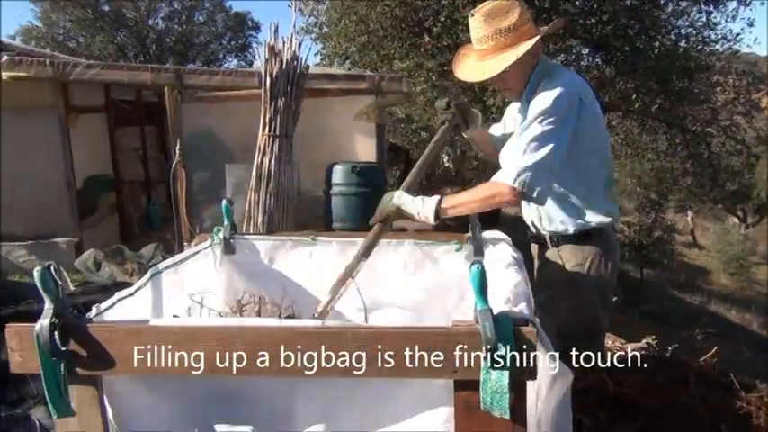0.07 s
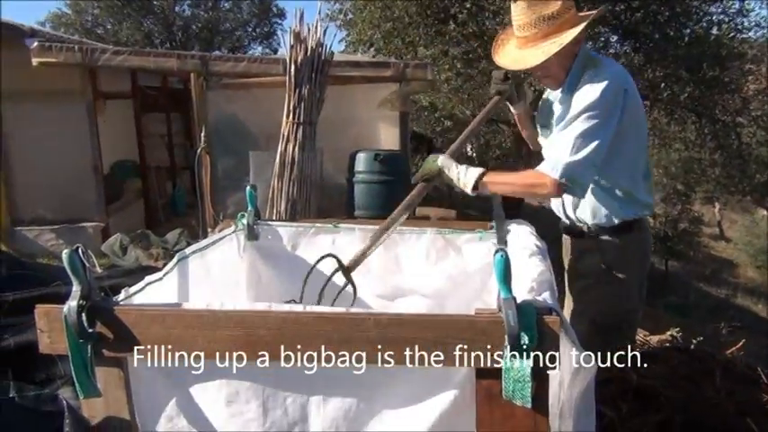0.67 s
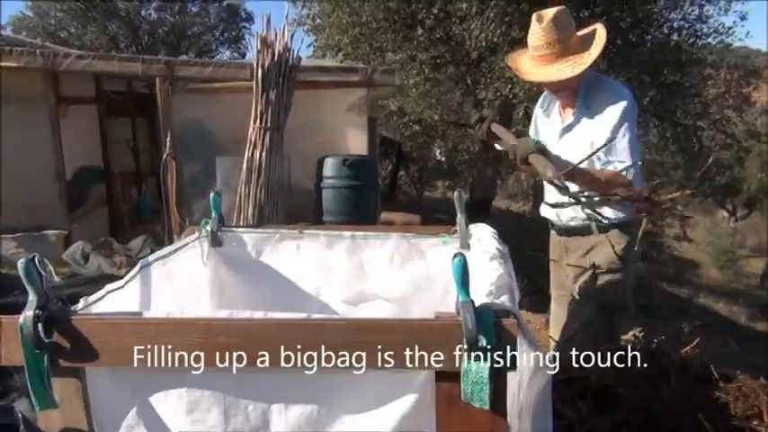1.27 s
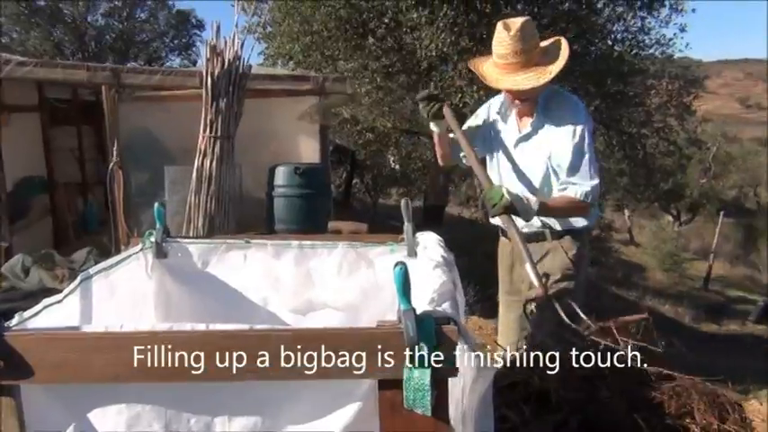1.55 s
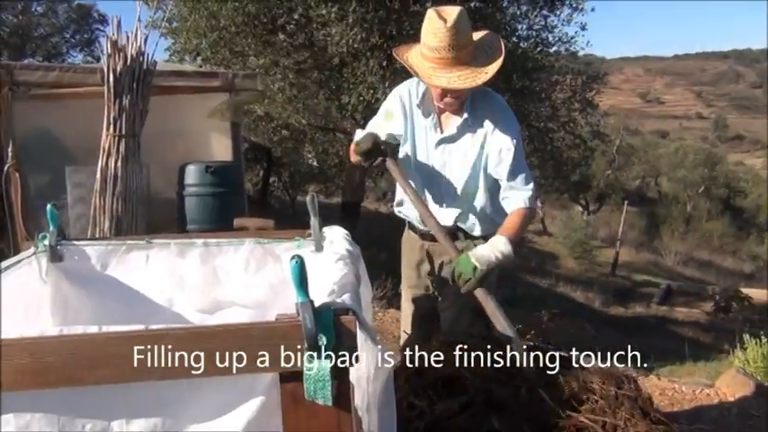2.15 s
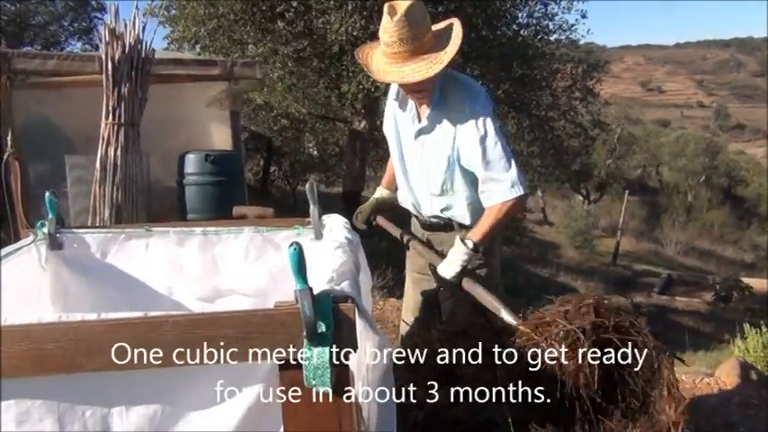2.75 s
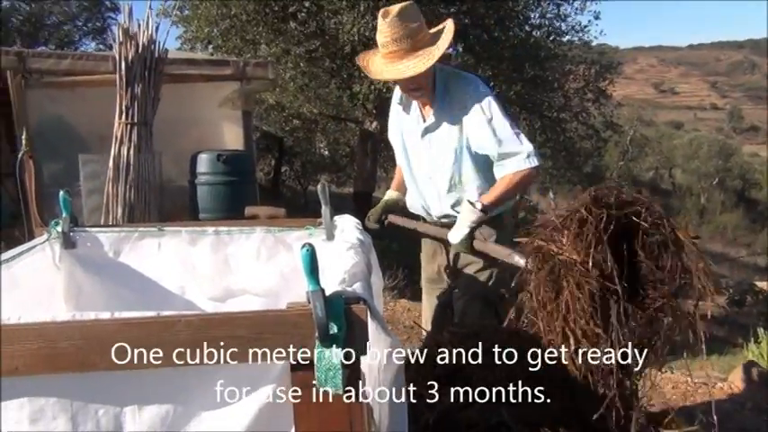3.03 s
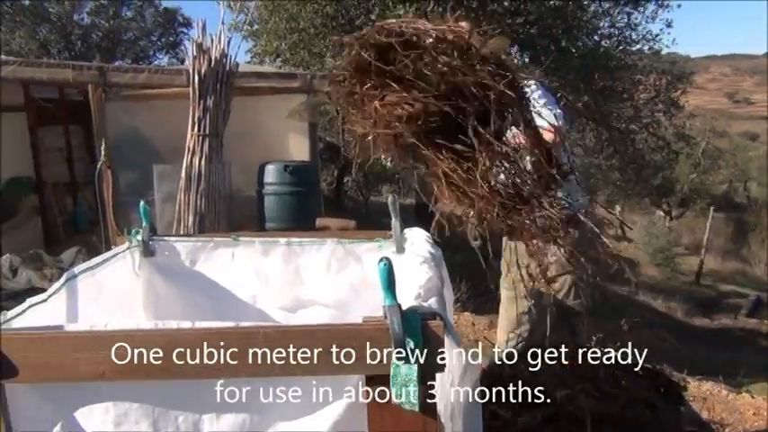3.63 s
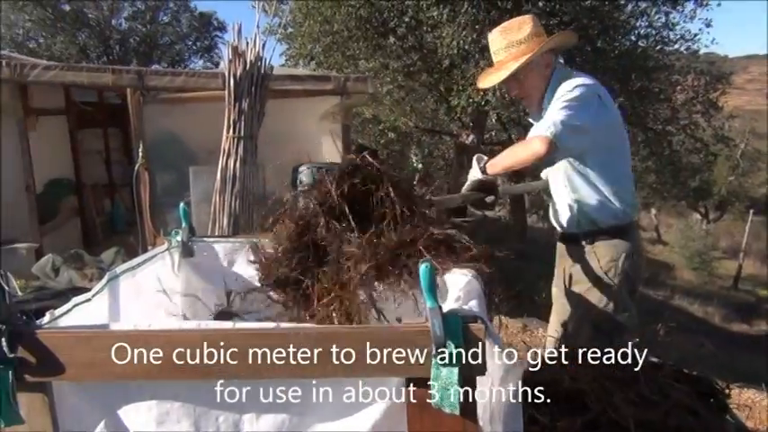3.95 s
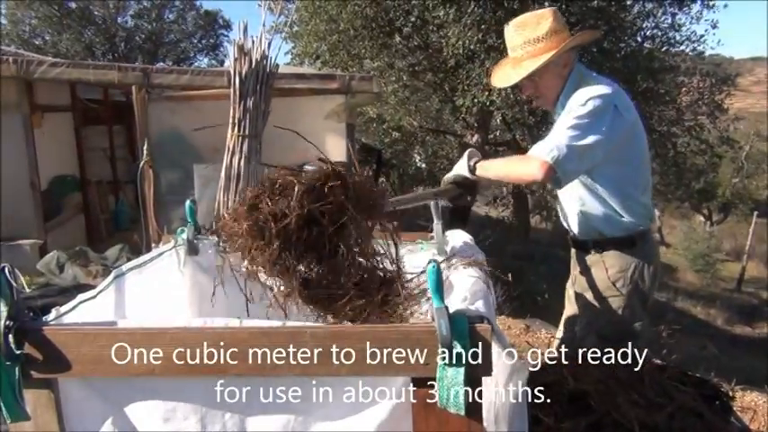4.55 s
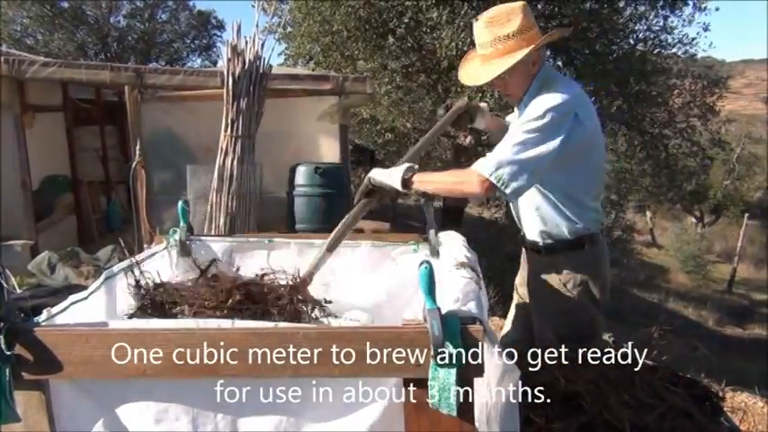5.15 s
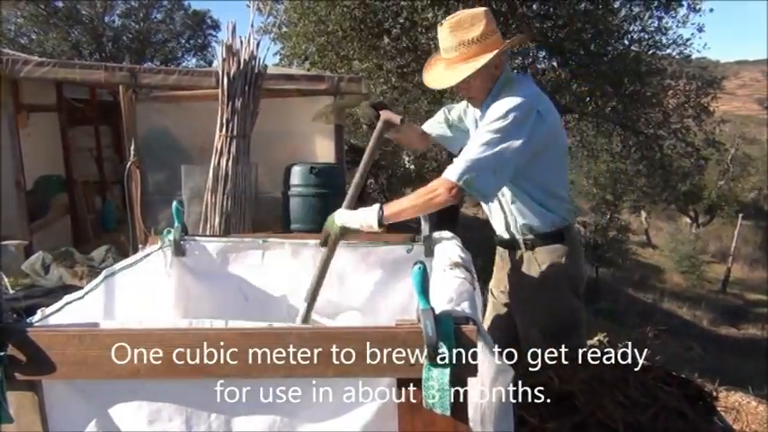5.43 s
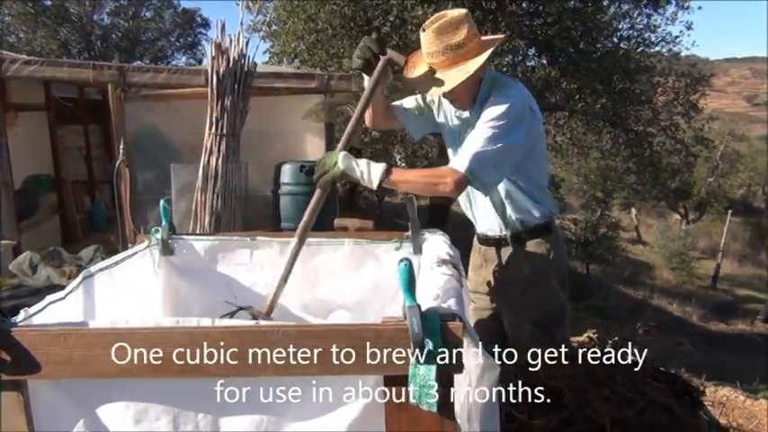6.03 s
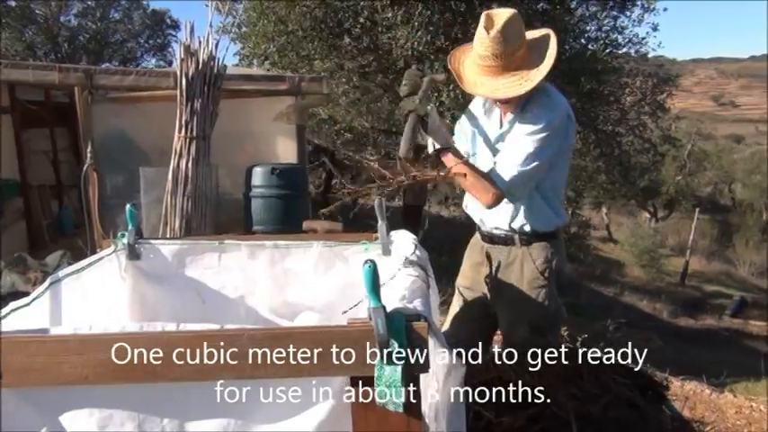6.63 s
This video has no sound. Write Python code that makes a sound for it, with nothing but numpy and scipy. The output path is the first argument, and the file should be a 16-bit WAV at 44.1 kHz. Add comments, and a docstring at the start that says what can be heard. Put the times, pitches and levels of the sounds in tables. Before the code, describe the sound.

Outdoors, a forkful of dry, half-composted grass knocks onto a big woven bag and slides down it in a crackling rush. More quietly, the steel pitchfork scrapes the ground with a brief ring and rakes the heap, snapping stalks. Two more rushes follow, with clods drumming on the taut fabric slightly to the left. Behind it are a faint open-air hiss, one thin bird call and light wind on the microphone.

```python
"""Knocks and dense crackling rushes: a pitchfork shakes dry, half-composted grass into a big woven bag.
Clods drum on the taut fabric, then each forkful slides down it, rubbing and breaking in tiny fractures.
Between loads the steel tines ring on the ground and rake the heap; single stalks snap.
Behind it: one thin bird call, light wind on the microphone, a hiss of open air and a faint hollow hum."""
import sys
import numpy as np
from scipy import signal
from scipy.fft import rfft, irfft, next_fast_len
from scipy.io import wavfile
from scipy.ndimage import map_coordinates

SR = 44100
rng = np.random.default_rng(int(sys.argv[2]) if len(sys.argv) > 2 else 0)


def to_wav(s):
    """Save 16-bit WAV."""
    ch = np.atleast_2d(s).T  # columns
    pcm = np.round(np.clip(ch, -1, 1) * 32767)  # PCM
    wavfile.write(sys.argv[1], SR, pcm.astype(np.int16))


N = 299439

# spectra of dry stalks, crunching heap, buffeting air: (frequency [Hz], density [dB])
STALK_SPECTRUM = [(200, -63.5), (1200, -10.5), (3000, 0), (4500, -2), (6000, -3.5), (7600, 1), (9500, 0.5),
                  (11500, -4), (13500, -9), (16000, -22)]
CRUNCH_SPECTRUM = [(60, -13), (200, 1), (500, 4), (900, -2), (1500, 3), (2600, -3.5), (4000, -6.5),
                   (8000, -14)]
GUST_SPECTRUM = [(20, -10), (45, 2.5), (85, 2.5), (130, -3.5), (220, -25.5), (500, -51.5)]
# wind on the microphone: (time [s], level [dB], frequency [Hz])
WIND_PUFFS = [(1.283, -42, 65.5), (1.77, -43.5, 80), (1.921, -40.5, 50), (2.895, -41.5, 54.7),
              (3.246, -47.5, 60), (5.66, -31.5, 50), (5.84, -38.5, 65), (6.538, -29, 90), (6.659, -38, 65)]
# background gain: (time [s], level [dB])
BACKGROUND_GAIN = [(0, -2.5), (2.9, 0), (3.15, -5), (3.7, -9.5), (3.95, -16), (4.9, -7.5), (5.9, 3),
                   (6.79, 3.5)]


def slide(rasp_db=-2, billow_db=-17):
    """The load thumps the bag, scrapes over its weave and crackles within itself."""
    # spectra: (frequency [Hz], density [dB])
    weight_spectrum = [(20, -40), (60, -14), (110, -4), (160, -3), (220, 0), (300, -4), (450, -15),
                       (900, -45)]
    rub_spectrum = [(50, -64.5), (170, -17), (330, -9.5), (520, 0.5), (680, -3), (850, -4.5), (1150, -3),
                    (1700, -6.5), (2700, -11), (3600, -16), (5000, -19.5), (9000, -29)]
    rasp_spectrum = [(100, -69.5), (600, -26.5), (1300, 2), (1750, 2), (2900, -2.5), (3700, -10.5),
                     (6000, -31)]
    fabric_db, stalk_db, weight_db = slide_levels()
    billow = amp(weight_db + billow_db) * unit(stereo(colour(rng.standard_normal((2, N)), GUST_SPECTRUM)))
    thump = crackle(weight_spectrum, rate_hz=300, spread_db=1, rub_db=-8, clump_db=1, clump_hz=40)
    rush = crackle(rub_spectrum, rate_hz=1800, spread_db=2.5, rub_db=-4, clump_db=1.7, clump_hz=80)
    trickle = crackle(rub_spectrum, rate_hz=700, spread_db=1.5, rub_db=-4, clump_db=3, clump_hz=70)
    rasp = crackle(rasp_spectrum, rate_hz=1700, spread_db=3, rub_db=2, clump_db=3, clump_hz=180)
    fizz = crackle(STALK_SPECTRUM, rate_hz=2500, spread_db=3, rub_db=-3, clump_db=1.4, clump_hz=160)
    ticks = crackle(STALK_SPECTRUM, rate_hz=900, spread_db=4.5, rub_db=-5, clump_db=2.8, clump_hz=85)
    flow = np.clip((fabric_db + 41) / 20.5, 0, 1)  # 0: separate grains, 1: dense pour
    speed = np.clip((fabric_db + 22.5) / 8, 0, 1)  # only the fastest sliding rasps
    fabric = amp(fabric_db) * (blend(rush, trickle, flow) + speed * amp(rasp_db) * rasp)
    stalks = amp(stalk_db) * blend(fizz, ticks, flow)
    return billow + amp(weight_db) * thump + fabric + stalks


def slide_levels(dull_db_per_s=9.5, settle_db_per_s=10.5):
    """Fabric, stalk and weight levels [dB]; as a load packs down, stalks fade and weight tells more."""
    # sliding grass: (start [s], attack [s], hold [s], release [s], fabric [dB], stalk [dB], weight [dB])
    slides = [(0, 0.0015, .03, 0.04, -21.5, -29, -29.5), (0.043, 0.036, 0.061, .03, -29.5, -29, -38.5),
              (0.102, 0.031, 0.084, 0.19, -15, -15, -26), (0.419, .006, 0.017, .3, -34.5, -39, -47),
              (0.635, 0.011, 0.0087, 0.043, -35.5, -42, -49), (0.798, .06, 0.16, 0.14, -49.5, -66.5, -60),
              (3.759, 0.013, 0.13, 0.18, -40, -42, -47.5), (3.848, 0.17, .035, .04, -37.5, -31, -42),
              (4.053, .009, 0.023, 0.055, -22.5, -23, -34.5),
              (4.087, 0.038, 0.058, 0.35, -18.5, -23, -32.5), (4.543, 0.036, .05, 0.85, -47.5, -48, -59),
              (5.024, 0.013, .03, .12, -33.5, -37.5, -39.5), (5.134, .12, .04, .06, -29, -37.5, -42),
              (5.264, 0.051, .12, .19, -19, -23, -33.5), (5.526, 0.046, .02, .08, -20.5, -26, -32),
              (5.607, 0.05, .015, 0.088, -20, -22.5, -32), (5.697, 0.036, 0.017, 0.26, -36, -37, -42),
              (5.928, 0.038, .1, 0.7, -50.5, -53.5, -59.5)]
    power = np.full((3, N), 1e-12)
    for start_s, attack_s, hold_s, release_s, fabric_db, stalk_db, weight_db in slides:
        gain = swell(start_s, attack_s, hold_s, release_s)
        on = gain > 1e-4
        age_s = np.flatnonzero(on) / SR - start_s
        power[0, on] += (gain[on] * amp(fabric_db)) ** 2
        power[1, on] += (gain[on] * amp(stalk_db - dull_db_per_s * age_s)) ** 2
        power[2, on] += (gain[on] * amp(weight_db + settle_db_per_s * age_s)) ** 2
    return 10 * np.log10(power)


def clods(crumble_s=0.0056, crumble_db=-22, rattle_db=-14, crackle_t60_s=0.054, contact_hz=2700,
          crease_hz=1617, crease_scatter=0.048, gain_db=-21):
    """Each clod slaps the fabric once and crumbles; hard ones also rattle over its creases."""
    # (time [s], level [dB], hardness [dB], crackle [dB], drum pitch [Hz])
    impacts = [(0.016, 1, -9.5, -14.5, 468), (0.116, -5.5, -3, -10, 659), (0.43, -13.5, -6.5, -23.5, 650),
               (0.538, -19.5, -1.5, -22.5, 436), (0.557, -19, -7.5, -26, 653),
               (0.576, -17.5, -10, -23, 427), (0.605, -24.5, -2, -10, 554),
               (0.641, -19.5, -9.5, -12.5, 590), (0.751, -28.5, -15, -17.5, 524),
               (0.798, -28, -5.5, -4.5, 590), (0.915, -33, -2, -21, 603), (0.944, -10.5, -16, -20.5, 537),
               (3.771, -30, -6, -11.5, 430), (4.003, -9, -25, -13, 600), (4.012, -15, -10, -7, 590),
               (4.055, -15.5, -10, -9.5, 695), (4.1, -5, -8, -20, 540), (4.205, -6, -29, -23.5, 570),
               (4.448, -13.5, -30, -14.5, 547), (4.584, -26.5, -11, -18.5, 563),
               (4.665, -22.5, -11, -13, 577), (4.699, -28, -22, -6.5, 570), (4.793, -27.5, -5.5, -20, 536),
               (4.869, -24.5, -15, -7.5, 685), (4.926, -23, -24, -13, 770), (5.052, -12, -11, -15, 560),
               (5.094, -22.5, -7, -17.5, 600), (5.133, -21.5, -0.5, -16.5, 707),
               (5.146, -25, -5.5, -13, 680), (5.193, -20, -2, -11, 730), (5.22, -13.5, -5.5, -14.5, 530),
               (5.307, -5.5, -31, -22.5, 500), (5.325, -6.5, -14, -18.5, 564),
               (5.531, -9.5, -3.5, -19.5, 595), (5.584, -4.5, -24, -24, 486),
               (5.667, -6.5, -25, -14.5, 534), (5.927, -24.5, -26, -12.5, 540),
               (6.046, -26.5, -6, -17, 625), (6.077, -15, -8, -11.5, 535), (6.184, -25, -5.5, -16, 710),
               (6.62, -28, -25, -6, 593)]
    # resonances: (multiple of drum or pop pitch, width [Hz], level [dB])
    fabric_modes = [(.4, 121, -13), (1, 106.7, 4.5), (1.66, 70, -4.5), (2.3, 241, -20)]
    crease_modes = [(.8, 160, -4), (1, 119, 9.5), (1.2, 170, -2), (1.55, 198, -2.5)]
    out, t = np.zeros((2, N)), np.arange(4096) / SR
    soft_contact = signal.butter(4, contact_hz, fs=SR, output="sos")
    for time_s, db, hard_db, crackle_db, drum_hz in impacts:
        pop_hz = crease_hz * np.exp(crease_scatter * rng.standard_normal())
        noise = rng.standard_normal((4, len(t)))
        force = amp([[crumble_db], [rattle_db]]) * noise[:2] * np.exp(-t / crumble_s)
        force[:, 0] -= 1  # the slap
        force = signal.sosfilt(soft_contact, force)
        drum = resonate(force[0], [(k * drum_hz, width, level) for k, width, level in fabric_modes])
        pop = resonate(force[1], [(k * pop_hz, width, level) for k, width, level in crease_modes])
        pop_share = np.clip(2 * amp(hard_db) ** 2, 0, .9)
        knock = blend(unit(pop), unit(drum), pop_share)
        burst = noise[2:] * amp(-60 * t / crackle_t60_s)
        straw = amp(crackle_db) * unit(stereo(colour(burst, STALK_SPECTRUM)))
        add(out, time_s + .0015, amp(db + gain_db) * (knock + straw))
    return out


def pan_bag(x):
    """The bag stands a little to the left."""
    # left minus right: (frequency [Hz], level [dB]) and (frequency [Hz], phase [rad])
    balance = [(100, -0.5), (380, -0.5), (700, 2.5), (1300, 1.5), (4400, -0.5), (8000, 1.5), (14000, -0.4)]
    lead = [(0, 0.016), (6370, 0.0066), (7670, 0.3), (16100, 0.1)]
    sides = np.array([[.5], [-.5]])
    return filtered(x, lambda hz: amp(sides * along(balance, hz)) * np.exp(1j * sides * along(lead, hz)))


def heap(ticks_db=-8):
    """The tines push into the heap and tear a forkful loose; single straws tick in the swish."""
    # fork and boots: (start [s], attack [s], hold [s], release [s], crunch [dB], stalk [dB])
    strokes = [(1.067, 0.13, 0.022, 0.099, -48, -50.5), (1.294, .012, .008, .03, -37, -49.5),
               (1.335, 0.027, .005, 0.25, -52, -55), (1.513, 0.035, .09, 0.083, -48.5, -48),
               (1.98, .05, 0.073, 0.086, -44.5, -33.5), (2.08, 0.18, .16, 0.31, -48.5, -51),
               (2.611, 0.16, 0.025, 0.27, -52.5, -48), (2.8, 0.08, 0.0296, 0.74, -58, -49),
               (3.304, 0.55, .1, 0.16, -53.5, -52.5), (6.54, 0.044, 0.076, .1, -47, -52),
               (6.673, 0.075, .05, .1, -45, -38)]
    # (frequency [Hz], density [dB])
    straw_spectrum = [(2000, -23), (5000, -14), (8000, 2), (10500, 0.5), (12500, -13), (16000, -24)]
    power = sum(np.outer(amp([crunch_db, stalk_db]), swell(*timing_s)) ** 2
                for *timing_s, crunch_db, stalk_db in strokes)
    push, tear = np.sqrt(power)
    crunch = crackle(CRUNCH_SPECTRUM, rate_hz=1100, spread_db=3.5, rub_db=2.5, clump_db=2, clump_hz=70)
    swish = crackle(STALK_SPECTRUM, rate_hz=2200, spread_db=3, rub_db=3, clump_db=1.1, clump_hz=64)
    ticks = crackle(straw_spectrum, rate_hz=70, spread_db=3, rub_db=-15, clump_db=1.5, clump_hz=30)
    return push * crunch + tear * (swish + amp(ticks_db) * ticks)


def snaps(width_hz=4500, gain_db=-22, splinter_db=-13, splinter_t60_s=0.026):
    """A dry stalk breaks with a tick and a few splinters, each stalk at its own rough pitch."""
    # (time [s], level [dB], pitch [Hz])
    breaks = [(0.8862, -33.5, 2970), (1.2994, -30, 9030), (1.375, -34.5, 8240), (1.539, -32, 3100),
              (2.1146, -19.5, 3040), (2.7347, -31.5, 4100), (2.8548, -28, 6800), (2.885, -25, 8370),
              (2.954, -29, 8510), (3.169, -27, 5900), (3.1762, -29, 9700), (3.2807, -31, 7440),
              (3.3193, -37, 8150), (3.453, -36, 7260), (3.7714, -23, 8140), (3.834, -27, 8370),
              (3.956, -22, 8700), (4.814, -33, 8730), (4.9693, -28.5, 7700), (5.109, -26, 9400),
              (5.1724, -24.5, 8970), (5.7637, -15, 9320), (5.8427, -25.5, 4300)]
    out, t = np.zeros((2, N)), np.arange(2048) / SR
    for time_s, db, hz in breaks:
        force = amp(splinter_db - 60 * t / splinter_t60_s) * rng.standard_normal((2, len(t)))
        force[:, 0] += 1
        snap = colour(resonate(force, [(hz, width_hz, 0)]), STALK_SPECTRUM)
        add(out, time_s + .001, amp(db + gain_db) * unit(snap))
    return stereo(out)


def tines(time_s=1.572, gain_db=-38, rise_s=0.0022, blur_hz=90, scrape_db=-2, scrape_t60_s=.06):
    """The fork scrapes onto the ground; its tines ring, choked by the straw."""
    # (frequency [Hz], level [dB], t60 [s])
    steel_modes = [(192, 1.5, 0.17), (463, 6, 0.11), (1486, -14, 0.17), (2600, -8.5, .25),
                   (3100, -4.5, 0.32), (3940, -9, 0.38), (6830, 0.5, 0.14), (7200, -10.5, .2),
                   (7940, -3, .22), (9350, -2.5, 0.21), (10970, -2, 0.18), (13720, -10.5, .2)]
    ring, t = np.zeros((2, N)), np.arange(N) / SR - time_s
    near = abs(t - .15) < .25
    t = t[near]
    fade = lambda t60_s: amp(-60 * np.maximum(t, 0) / t60_s) * np.exp(np.minimum(t, 0) / rise_s)
    for hz, db, t60_s in steel_modes:
        shiver = unit(resonate(rng.standard_normal((2, len(t))), [(hz, blur_hz + hz / 150, 0)]))
        ring[:, near] += amp(db) * shiver * fade(t60_s)
    grit = unit(colour(rng.laplace(size=(2, len(t))), CRUNCH_SPECTRUM))
    ring[:, near] += amp(scrape_db) * grit * fade(scrape_t60_s)
    return amp(gain_db) * stereo(ring)


def bird(start_s=.655, level_db=-51, start_hz=8150, end_hz=7150, fall_s=.045, waver_hz=80):
    """One thin whistle from the trees, falling and levelling off."""
    age_s = np.maximum(np.arange(N) / SR - start_s, 0)
    hz = end_hz + (start_hz - end_hz) * np.exp(-(age_s / fall_s) ** 2) + waver_hz * wobble(180)
    gain = swell(start_s, attack_s=0.036, hold_s=.05, release_s=.13) * amp(level_db + 2.5 * wobble(91))
    return gain * np.sin(2 * np.pi * np.cumsum(hz) / SR)


def puffs(rise_s=0.011):
    """Each puff of wind pushes the microphone diaphragm back and forth a couple of times."""
    out, t = np.zeros(N), np.arange(8192) / SR
    envelope = (t / rise_s * np.exp(1 - t / rise_s)) ** 2
    for time_s, db, hz in WIND_PUFFS:
        add(out, time_s, amp(db) * envelope * np.sin(2 * np.pi * (hz * t + rng.random())))
    return out


def wind(breeze_db=-58, gust_db=-9, gust_s=0.062):
    """Soft low buffets that swell around each puff."""
    t = np.arange(N) / SR
    rumble = stereo(colour(rng.standard_normal((2, N)), GUST_SPECTRUM))
    buffets = unit(rumble * amp(1.9 * wobble(22)))
    gusts = sum(amp(db + gust_db) * np.exp(-((t - time_s) / gust_s) ** 2) for time_s, db, _ in WIND_PUFFS)
    return (amp(curve(BACKGROUND_GAIN) + breeze_db) + gusts) * buffets


def open_air(hiss_db=-47.5, hum_db=-53):
    """Diffuse hiss and a faint hollow hum, both wavering in level."""
    # (frequency [Hz], density [dB])
    air_spectrum = [(30, 3), (100, -10), (200, 1.5), (330, -5.5), (500, -0.5), (750, -6), (1300, -8),
                    (2200, -8), (4000, -12), (8000, -12), (12000, -14), (16000, -10)]
    # (frequency [Hz], width [Hz], level [dB])
    hum_modes = [(610, 70, -4.5), (855, 49, 0)]
    # (frequency [Hz], left-right correlation)
    diffuse = [(60, 0.85), (200, 0.83), (400, 0.49), (1300, 0.18), (4000, 0.26), (8000, 0.55),
               (14000, 0.96)]
    hiss_gain = amp(hiss_db + .4 * wobble(14))
    hiss = unit(stereo(colour(rng.standard_normal((2, N)), air_spectrum), diffuse))
    hum_gain = amp(hum_db + 1.8 * wobble(6))
    hum = unit(stereo(resonate(rng.standard_normal((2, N)), hum_modes), diffuse))
    return amp(curve(BACKGROUND_GAIN)) * (hiss_gain * hiss + hum_gain * hum)


def crackle(spectrum, rate_hz, spread_db, rub_db, clump_db, clump_hz):
    """Tiny fractures of uneven size over smooth rubbing, bunched in clumps; stereo, rms 1."""
    breaks = rng.random(N) < rate_hz / SR
    sizes = amp(spread_db * np.minimum(rng.exponential(size=N), 3))
    grains = unit(breaks * sizes * rng.choice([-1, 1], (2, N)))
    rubbing = amp(rub_db) * rng.standard_normal((2, N))
    force = (grains + rubbing) * amp(clump_db * wobble(clump_hz))
    return unit(stereo(colour(force, spectrum)))


def swell(start_s, attack_s, hold_s, release_s, rise_bend=1.47, fall_bend=1.85):
    """Gain of one movement: 0.1 at start_s, 1 during the hold, 0.1 again after release_s."""
    t = np.arange(N) / SR - start_s
    early = np.clip(1 - t / attack_s, 0, 10)
    late = np.clip((t - attack_s - hold_s) / release_s, 0, 10)
    return 10 ** -(early ** rise_bend + late ** fall_bend)


def amp(db):
    """Decibels to gain."""
    return 10 ** (np.asarray(db) / 20)


def unit(x):
    """Scale to rms 1."""
    return x / np.sqrt(np.mean(x ** 2) + 1e-20)


def blend(a, b, share_a):
    """Equal-power mix."""
    return np.sqrt(share_a) * a + np.sqrt(1 - share_a) * b


def along(points, hz):
    """Interpolate (frequency [Hz], value) points on a log axis."""
    knots_hz, values = np.transpose(points)
    return np.interp(np.log(hz + 1), np.log(knots_hz + 1), values)


def curve(points):
    """Interpolate (time [s], value) points at every sample."""
    return np.interp(np.arange(N) / SR, *np.transpose(points))


def wobble(rate_hz):
    """Smooth random curve, rate_hz knots a second."""
    return map_coordinates(rng.standard_normal(8192), [np.arange(N) * rate_hz / SR], mode="wrap")


def filtered(x, response):
    """Apply a complex frequency response."""
    n = x.shape[-1]
    padded = next_fast_len(n + 4096)
    return irfft(rfft(x, padded) * response(np.fft.rfftfreq(padded, 1 / SR)), padded)[..., :n]


def colour(x, spectrum):
    """Filter by (frequency [Hz], gain [dB]) points."""
    return filtered(x, lambda hz: amp(along(spectrum, hz)))


def resonate(x, modes):
    """Parallel damped resonances: (frequency [Hz], width [Hz], level [dB])."""
    return filtered(x, lambda hz: sum(amp(db) * 1j * hz * width / (centre**2 - hz**2 + 1j * hz * width)
                                      for centre, width, db in modes))


def stereo(pair, correlation=None):
    """Two independent signals to left and right; by default as correlated as rustling."""
    # (frequency [Hz], left-right correlation)
    rustling = [(60, .93), (200, .97), (700, .985), (2500, .988), (4500, .98), (8000, .92), (14000, .8)]
    angle = lambda hz: np.arccos(np.clip(along(correlation or rustling, hz), -1, 1)) / 2
    mid, side = filtered(pair, lambda hz: np.array([np.cos(angle(hz)), np.sin(angle(hz))]))
    return np.array([mid + side, mid - side])


def add(track, time_s, sound):
    """Mix a short sound in at time_s."""
    part = track[..., max(round(time_s * SR), 0):][..., :sound.shape[-1]]
    part += sound[..., :part.shape[-1]]


def scene(dip_s=3.43, dip_db=-16.5, dip_width_s=0.082):
    """All sources in the open, no echo; the level dips briefly midway."""
    dip = amp(dip_db * np.exp(-np.abs(np.arange(N) / SR - dip_s) / dip_width_s))
    bag = pan_bag(slide() + clods())
    return dip * (bag + heap() + snaps() + tines() + bird() + open_air() + wind() + puffs())


def record(dry):
    """The camera rounds off the highest peaks and keeps nothing above its band limit."""
    limit_hz = 15950
    rounded = dry / (1 + np.abs(dry) ** 6) ** (1 / 6)
    return filtered(rounded, lambda hz: hz < limit_hz)


dry = scene()
out = record(dry)
to_wav(out)
```